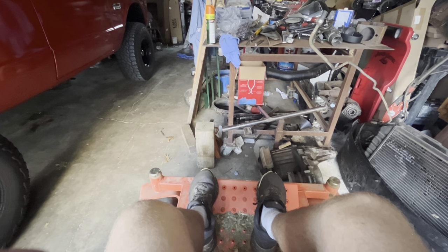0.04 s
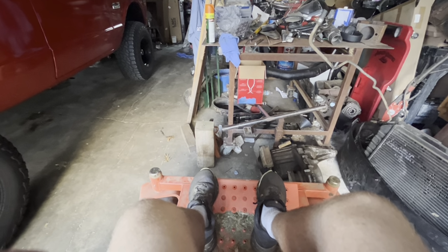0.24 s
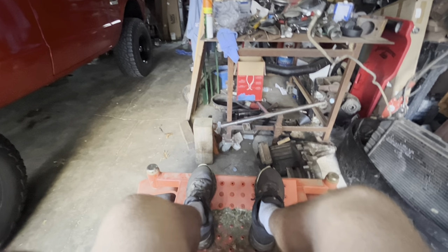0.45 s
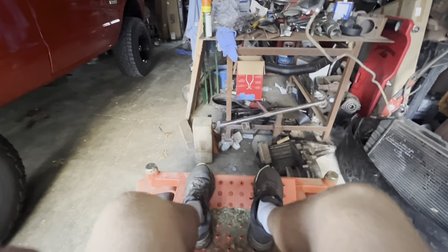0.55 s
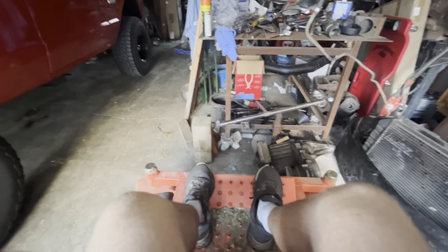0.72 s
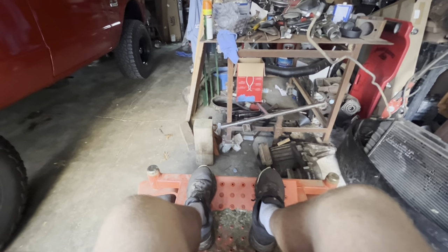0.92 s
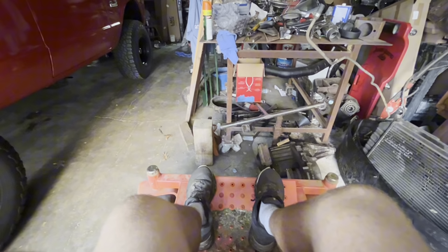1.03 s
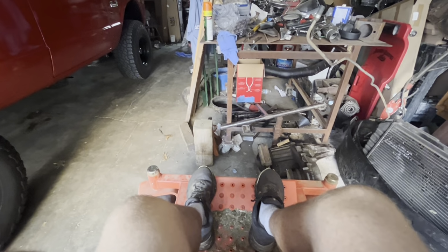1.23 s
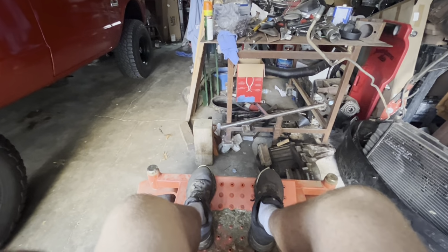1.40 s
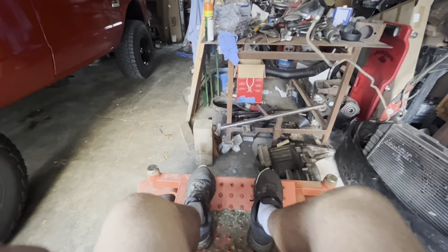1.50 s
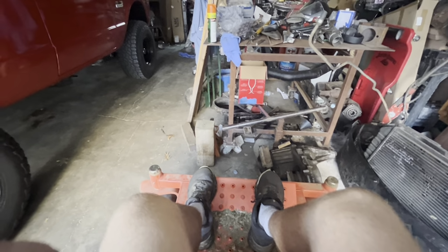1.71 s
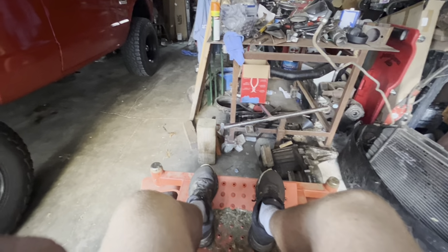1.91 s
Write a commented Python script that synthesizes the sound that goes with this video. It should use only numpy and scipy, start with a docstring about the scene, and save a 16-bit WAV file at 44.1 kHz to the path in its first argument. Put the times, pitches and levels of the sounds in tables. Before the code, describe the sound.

A pedal on a parked riding mower snaps free with a sharp double clunk and steel clatter, leaving a panel ringing faintly. A second later it shifts twice, softly, heard close in a garage over faint hiss.

```python
"""In a cluttered garage, a pedal on a parked riding mower is worked. It snaps free, knocks the footboard
and scrapes in its pivot; the linkage clunks home against the frame with a steel clatter, and a sheet
panel rings on. A second later the pedal shifts twice, softly, over a low rumble and hiss.
Impacts excite damped modes, friction and rattle are trains of random micro-impacts, and the room
answers with a diffuse reverberant field."""
import sys
import numpy as np
from scipy import signal
from scipy.fft import rfft, irfft
from scipy.io import wavfile

SR = 44100
rng = np.random.default_rng(int(sys.argv[2]) if len(sys.argv) > 2 else 0)


def output_pcm(signal):
    """Save a mono or channel-first signal as 16-bit PCM at the path in sys.argv[1].

    Samples are clipped to [-1, 1] before scaling.
    """
    pcm = np.clip(np.atleast_2d(signal).T, -1, 1) * 32767
    wavfile.write(sys.argv[1], SR, np.round(pcm).astype(np.int16))


N = 85995
T = np.arange(N) / SR
HZ = np.maximum(np.arange(N + 1) * SR / (2 * N), 1)


def amp(db):
    """Decibel law: 20 dB is a factor of ten in amplitude."""
    return 10 ** (np.asarray(db) / 20)


def curve(points, hz):
    """Interpolation of (frequency, value) points on a logarithmic frequency axis."""
    f, v = np.array(points, float).T
    return np.interp(np.log(hz), np.log(f), v)


def shape(x, gain):
    """Linear filtering: the spectrum is multiplied by a frequency response."""
    return irfft(rfft(x, 2 * N) * gain)[..., :N]


def through(x, response):
    """Convolution of an excitation with an impulse response."""
    return shape(x, rfft(response, 2 * N))


def unit(x):
    """Normalisation to unit energy per channel."""
    return x / np.sqrt(np.sum(x ** 2, axis=-1, keepdims=True) + 1e-18)


def fade(t60):
    """Exponential damping: 60 dB in t60 seconds."""
    return amp(-60 * T / t60)


def delayed(x, at):
    """Time shift: silence until `at` seconds, then x."""
    return np.interp(T - at, T, x, left=0)


def diffuse(coherent_below_hz=420):
    """Diffuse-field noise: the two channels are coherent only at long wavelengths."""
    mid, side = rng.standard_normal((2, N))
    apart = HZ / np.hypot(HZ, coherent_below_hz)
    return shape(mid + shape(side, apart) * np.array([[1], [-1]]), 1 / np.hypot(1, apart))


def ring(modes):
    """Modal superposition: an impulse response is a sum of damped sinusoids."""
    return sum(amp(db) * np.sin(2 * np.pi * hz * T) * fade(t60) for hz, db, t60 in modes)


def impacts(rows):
    """Elastic impact: each blow is a half-sine force pulse, duller the longer the contact."""
    force = np.zeros(N)
    for at, db, contact_ms in rows:
        pulse = np.sin(np.pi * np.clip((T - at) * 1000 / contact_ms, 0, 1))
        force += amp(db) * pulse / pulse.sum()
    return force


def micro_impacts(rows, clicks_per_s=1400, scatter_db=4.5):
    """Shot noise: random clicks under a linear rise and an exponential decay."""
    force = np.zeros(N)
    for at, db, rise, decay in rows:
        clicks = (rng.random(N) < clicks_per_s / SR) * np.sign(rng.standard_normal(N))
        clicks *= amp(-scatter_db * rng.standard_normal(N))
        effort = np.clip((T - at) / rise, 0, 1) * np.exp(-np.maximum(T - at - rise, 0) / decay)
        force += amp(db) * unit(clicks * effort)
    return force


def radiated(x, lag_s, pan_db, cutoff_hz=158):
    """Small plates radiate no deep bass. Lag and pan are those of the left channel against the right."""
    x = signal.sosfilt(signal.butter(6, cutoff_hz, "high", fs=SR, output="sos"), x)
    left = shape(x, np.exp(-2j * np.pi * HZ * lag_s))
    return np.array([left * amp(pan_db / 2), x * amp(-pan_db / 2)])


# spectrum of the steady noise: f/Hz, level/dB
HISS_SPECTRUM = [(20, -29), (45, -12), (72, -5.5), (100, 1.5), (135, -7), (240, -10.5), (400, -17),
                 (1000, -15), (2200, -22), (4500, -24), (6200, -25.5), (7800, -31), (9600, -29),
                 (11500, -39.5), (15000, -46)]
# Gaussian swells of the rumble: t/s, level/dB, width/s
RUMBLE_SWELLS = [(.42, -48.5, 0.17), (0.835, -48, 0.036), (1.215, -48, 0.087), (1.38, -47, 0.022),
                 (1.45, -47.5, 0.057), (1.67, -51, 0.14), (1.94, -47, 0.018)]


def background(hiss_db=-51, rumble_hz=75, bandwidth_hz=10):
    """Filtered noise: a steady broadband hiss and an amplitude-modulated narrowband rumble."""
    hiss = unit(shape(diffuse(), amp(curve(HISS_SPECTRUM, HZ))))
    band = np.exp(-((HZ - rumble_hz) / bandwidth_hz) ** 2)
    rumble = unit(shape(rng.standard_normal(N), band))
    swell = sum(amp(db) * np.exp(-((T - at) / width) ** 2) for at, db, width in RUMBLE_SWELLS)
    return (hiss * amp(hiss_db) + rumble * swell) * np.sqrt(N)


# a faint, brief hiss leading into the first snap (first row), then scrapes in the pivot:
# t/s, level/dB, rise/s, decay/s, resonance f/Hz, resonance lift/dB
GRIT_BURSTS = [(0.2395, -16.5, 0.0012, 0.0066, 2400, 16), (0.283, -9, 0.0021, 0.051, 2700, 11),
               (1.025, -41, 0.006, 0.034, 12700, 12), (1.271, -41.5, .004, 0.017, 12500, 17),
               (1.368, -23.5, 0.004, 0.03, 3840, 5.5), (1.6422, -19, 0.0026, 0.023, 5000, 4)]
# spectrum of the bursts: f/Hz, level/dB
GRIT_SPECTRUM = [(80, -43), (300, -41), (900, 5), (1800, -2), (3000, -1), (4200, 4.5), (6300, 2.5),
                 (7700, -6), (9500, -1), (10800, -7), (13500, -11)]


def hiss_and_scrapes(gain_db=10.5, relative_width=.1):
    """Shot noise through a resonance: a brief hiss, then the sliding friction of the pedal's pivot."""
    out = 0
    for at, db, rise, decay, peak_hz, lift_db in GRIT_BURSTS:
        resonance = amp(lift_db / (1 + ((HZ / peak_hz - 1) / relative_width) ** 2))
        grit = unit(shape(diffuse() * fade(t60=.05), amp(curve(GRIT_SPECTRUM, HZ)) * resonance))
        out = out + through(micro_impacts([(at, db, rise, decay)]), grit)
    return amp(gain_db) * out


# slips of the catch: t/s, level/dB, low-pass corner f/Hz, ring f/Hz, ring over crack/dB
SNAPS = [(0.2444, 2, 12300, 1996, -6), (1.309, -22, 5000, 4140, -5), (1.321, -22, 5000, 2180, -23),
         (1.3639, -18.5, 2500, 2090, -1.5), (1.61, -16, 3000, 9600, -12), (1.6426, -18, 11100, 1680, -10)]
# spectrum of the crack: f/Hz, level/dB
SNAP_SPECTRUM = [(80, -34), (300, -2), (900, 5), (1600, 3), (2350, 7), (3200, -4), (5500, -2), (9000, -5.5),
                 (15000, -6)]


def catch(gain_db=-3, rise_s=.0013, ring_t60=.01, overtone_ratio=1.21):
    """Transient excitation: the catch slips with a broadband crack and two heavily damped modes."""
    envelope = fade(t60=.016) * (1 - np.exp(-T / rise_s))
    out = 0
    for at, db, corner_hz, ring_hz, ring_db in SNAPS:
        spectrum = amp(curve(SNAP_SPECTRUM, HZ)) / np.hypot(1, HZ / corner_hz)
        crack = unit(shape(diffuse() * delayed(envelope, at), spectrum))
        modes = ring([(ring_hz, 0, ring_t60), (ring_hz * overtone_ratio, -2, ring_t60)])
        clack = radiated(unit(delayed(modes, at)), lag_s=.00008, pan_db=-5.5)
        out = out + amp(gain_db + db) * (crack + amp(ring_db) * clack)
    return out


# knocks of the pedal on the footboard: t/s, level/dB, contact time/ms
KNOCKS = [(.2472, 5.5, 0.77), (.2622, -1.5, 0.44), (.2678, -7, 0.81), (.283, -11, 1.5), (.3555, -9, 0.75),
          (1.274, -23.5, 2.7), (1.3218, -9, 1.94), (1.336, -27, 0.87), (1.3655, -28, 0.77),
          (1.4185, -18, 1.6), (1.571, -22.5, 2.4), (1.6115, -16.5, 1.78), (1.6445, -11, 1.67),
          (1.651, -15, 1.8), (1.6645, -26, 1)]
# footboard modes: f/Hz, level/dB, T60/s
BOARD_MODES = [(161, -23, 0.12), (198, -21, 0.081), (374.3, -9.5, 0.053), (498, 2.5, 0.014),
               (565, 0.5, 0.025), (633, -1, 0.027), (745, -4, 0.034), (976, -9.5, 0.029),
               (1097, -12.5, 0.026), (1267, -23, 0.039)]


def footboard(gain_db=.5, rise_s=.0027):
    """Impact excitation of a plate: the pedal strikes the footboard and rebounds."""
    response = amp(gain_db) * ring(BOARD_MODES) * (1 - np.exp(-T / rise_s))
    return radiated(through(impacts(KNOCKS), response), lag_s=.00051, pan_db=-1.5)


# sheet panel modes: f/Hz, level/dB, T60/s, left over right/dB
PANEL_MODES = [(544, -42, 2, 5), (678, -30, .95, -2), (711, -34.5, 1.3, 0), (770, -37, .45, 0),
               (845, -41, .65, 0)]


def panel(lag_s=.00035):
    """Free vibration: after the first knock, each lightly damped mode radiates with its own directivity."""
    struck_at = KNOCKS[0][0]
    return sum(radiated(delayed(ring([(hz, db, t60)]), struck_at), lag_s, pan_db)
               for hz, db, t60, pan_db in PANEL_MODES)


# blows of the linkage on the frame: t/s, level/dB, contact time/ms
FRAME_BLOWS = [(.2905, 10, 4.2), (.312, -6, 7.9), (.3295, -1.5, 0.34), (.3353, -0.5, 0.47),
               (.3518, -3.5, 1.62), (.3815, -7.5, 1.46), (1.3435, -5.5, 3.6), (1.3745, -12.5, 3.6),
               (1.6205, 0, 5.13), (1.6575, -15.5, 2.14)]
# frame modes: f/Hz, level/dB, T60/s
FRAME_MODES = [(158.5, -22.5, 0.057), (208.1, -16.5, 0.21), (252.2, -13, 0.23), (288, -18, 0.12),
               (319.7, -2, 0.059), (362, 1, 0.045), (409, -8, 0.074), (502, -24, 0.12), (632, -13, 0.11),
               (779.4, -12, 0.12), (1080, -24.5, 0.22), (1195.7, -21, 0.13)]


def frame(gain_db=-7, rise_s=.002):
    """Structural resonance: the linkage lands on the frame, whose low modes give a hollow clunk."""
    response = amp(gain_db) * ring(FRAME_MODES) * (1 - np.exp(-T / rise_s))
    return radiated(through(impacts(FRAME_BLOWS), response), lag_s=.00008, pan_db=-.5)


# bursts of chatter in the joints: t/s, level/dB, rise/s, decay/s
CLATTERS = [(0.324, -5, 0.0077, 0.0078), (0.3299, -3, 0.0046, 0.014), (0.348, -9, 0.0078, 0.015)]
# spectrum of a joint's crack: f/Hz, level/dB
CLATTER_SPECTRUM = [(80, -45), (300, -6), (800, 11), (1400, -4.5), (1850, 9), (2400, -6), (3100, 9.5),
                    (3900, 1.5), (5200, 2), (7500, -4.5), (9400, -4), (10500, -14.5), (14000, -13)]
# steel rod modes: f/Hz, level/dB, T60/s
ROD_MODES = [(1764, -4, .2), (1797, -2, .2), (2873, -6, .13), (3090, -5, .13), (3523, -8, .12),
             (5775, -4, .15), (7230, -7, .13), (9080, 3, .12), (9222, 7, .17), (9370, 4, .2),
             (9560, 0, .22)]


def linkage(joint_db=8, rod_db=-38):
    """Contact chatter: loose steel joints collide, each with its own crack, and excite the rods' modes."""
    joints = 0
    for burst in CLATTERS:
        crack = unit(shape(diffuse() * fade(t60=.022), amp(curve(CLATTER_SPECTRUM, HZ))))
        joints = joints + through(micro_impacts([burst]), crack)
    rods = np.array([through(micro_impacts(CLATTERS), ring(ROD_MODES)) for _ in range(2)])
    return amp(joint_db) * joints + amp(rod_db) * rods


# reverberation time of the garage: f/Hz, T60/s
GARAGE_T60 = [(100, 0.44), (300, 0.46), (800, 0.54), (2000, 0.34), (5000, 0.55), (10000, 0.17),
              (15000, 0.16)]
# spectrum of the reverberation: f/Hz, level/dB
GARAGE_SPECTRUM = [(60, 0), (125, 2), (155, 12), (205, 5), (350, 2.5), (600, -2.5), (1000, -2), (3000, -7),
                   (9000, -6), (15000, -23)]


def garage(wall_delay_s=.00092, build_up_cycles=1.2):
    """Reverberation: each octave of the room's response decays at its own rate; the bass builds up last."""
    noise_spectrum = rfft(diffuse(), 2 * N)
    response = 0
    for hz in 62.5 * 2 ** np.arange(9):
        band = irfft(noise_spectrum * np.clip(1 - abs(np.log2(HZ / hz)), 0, 1))[:, :N]
        build_up = 1 - np.exp(-(T / (wall_delay_s + build_up_cycles / hz)) ** 2)
        tail = band * fade(curve(GARAGE_T60, hz)) * build_up
        response = response + unit(tail) * np.sqrt(hz / SR)  # energy in proportion to bandwidth
    return shape(response, amp(curve(GARAGE_SPECTRUM, HZ)))


def scene():
    """Superposition of the direct sound, the reverberant field and the background."""
    # each source with its gain into the reverberation/dB
    sources = [(footboard(), -10.5), (frame(), -12.5), (catch(), 5.5), (linkage(), -4),
               (hiss_and_scrapes(), -14.5)]
    direct = sum(x for x, _ in sources) + panel()
    reverberant = through(sum(x * amp(db) for x, db in sources), garage())
    return direct + reverberant + background()


# level difference between the microphones: f/Hz, left over right/dB
MIC_BALANCE = [(150, -0.5), (350, 1.5), (600, -0.5), (1100, 5), (2200, 4), (4500, 8), (8000, -1),
               (12000, -2)]


def record(dry, ceiling=.85, top_hz=15100):
    """Transduction: the left microphone is brighter; saturation rounds the peaks; the top is cut steeply."""
    heard = shape(dry, amp(curve(MIC_BALANCE, HZ) * np.array([[.5], [-.5]])))
    heard = heard / (1 + (heard / ceiling) ** 6) ** (1 / 6)
    return signal.sosfilt(signal.ellip(8, .2, 70, top_hz, fs=SR, output="sos"), heard)


dry = scene()
out = record(dry)
output_pcm(out)
```